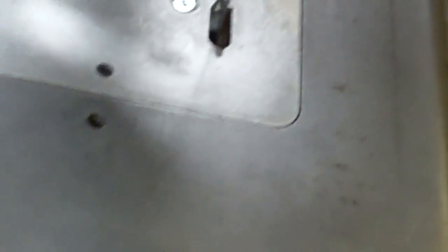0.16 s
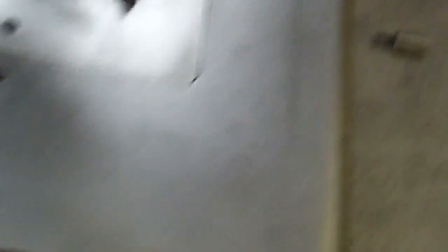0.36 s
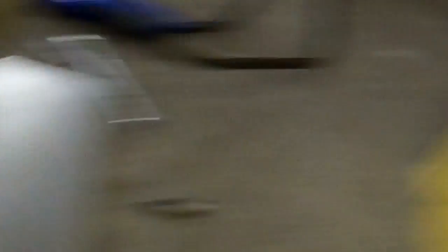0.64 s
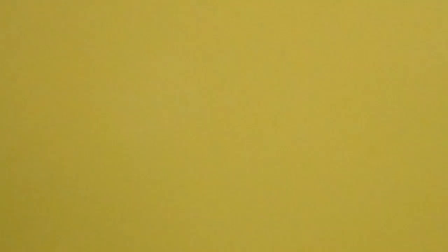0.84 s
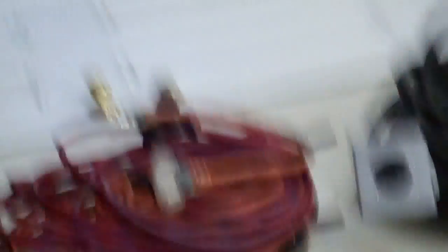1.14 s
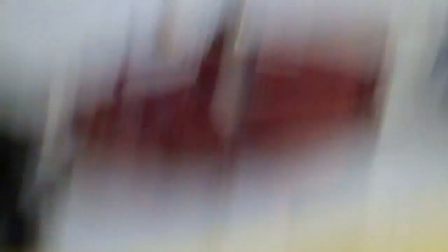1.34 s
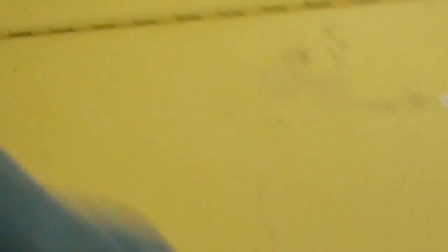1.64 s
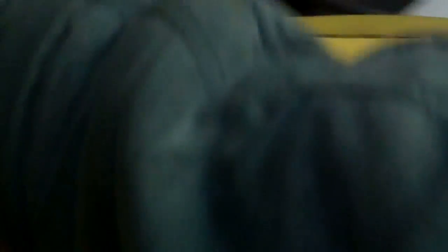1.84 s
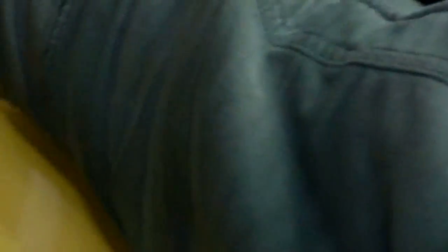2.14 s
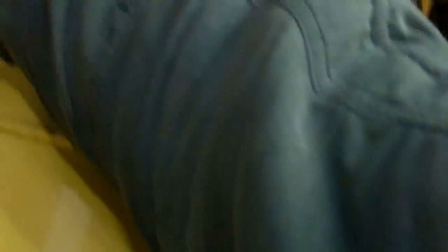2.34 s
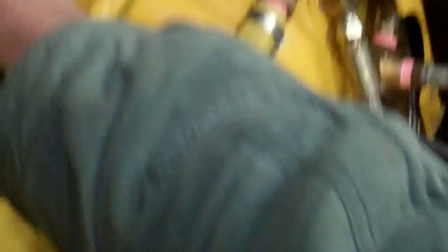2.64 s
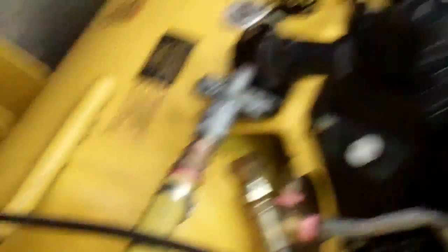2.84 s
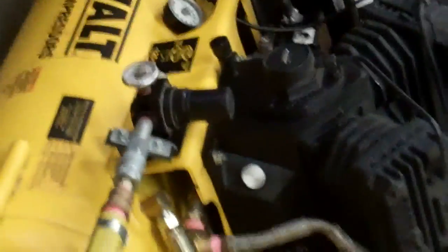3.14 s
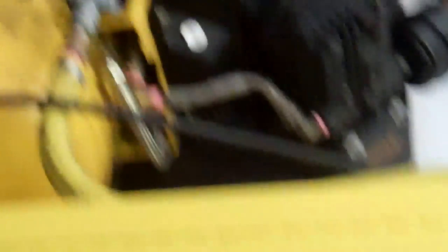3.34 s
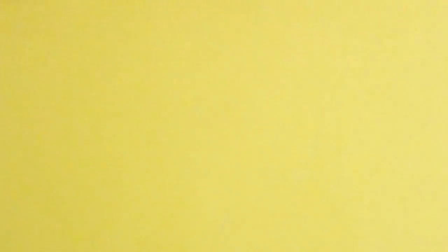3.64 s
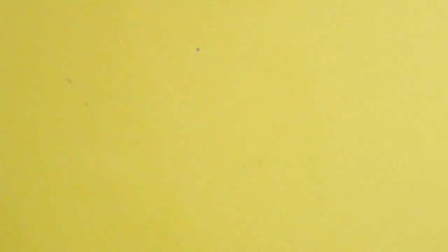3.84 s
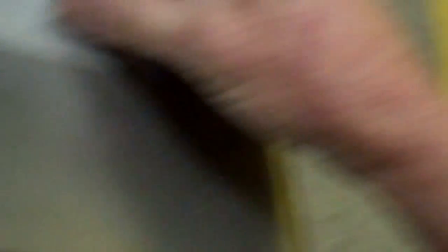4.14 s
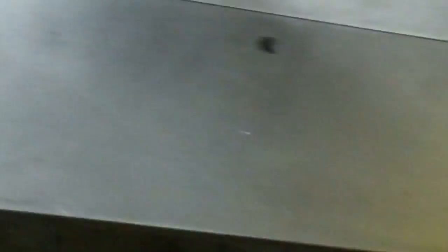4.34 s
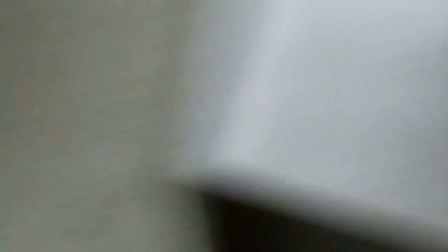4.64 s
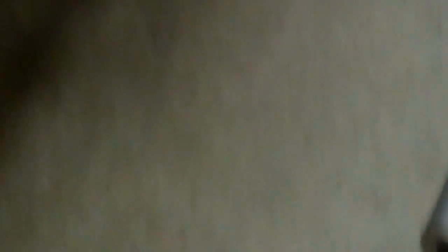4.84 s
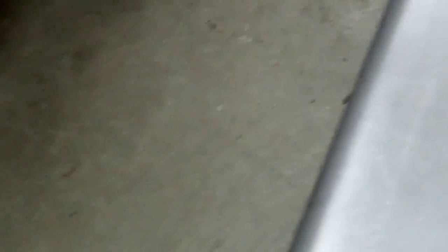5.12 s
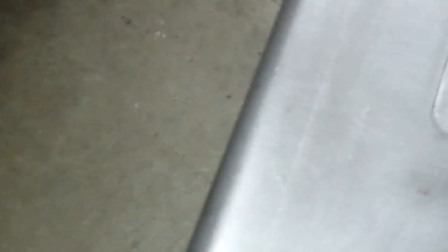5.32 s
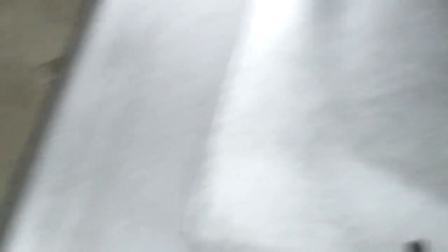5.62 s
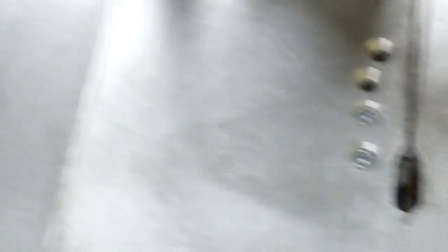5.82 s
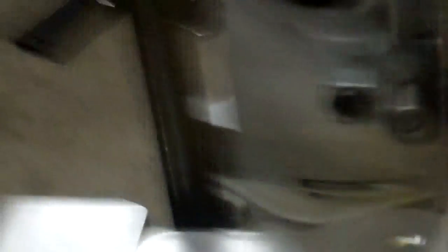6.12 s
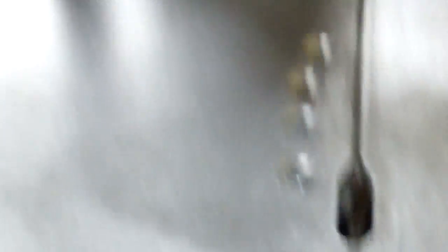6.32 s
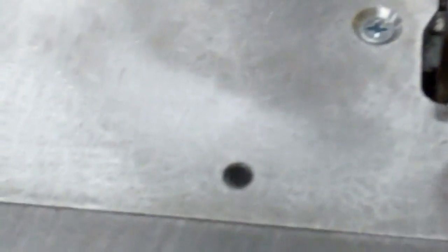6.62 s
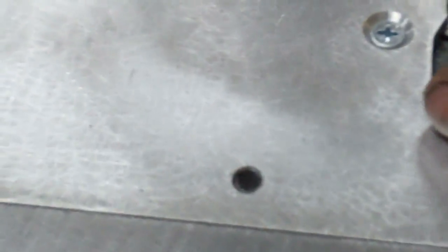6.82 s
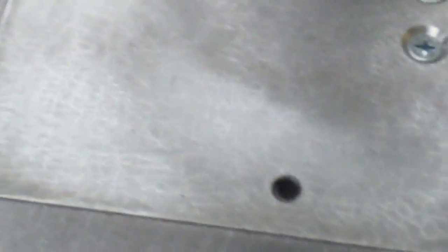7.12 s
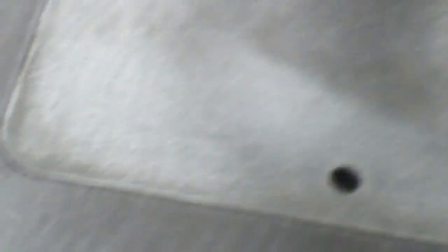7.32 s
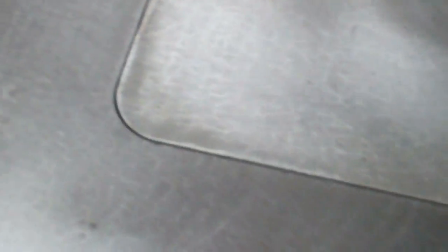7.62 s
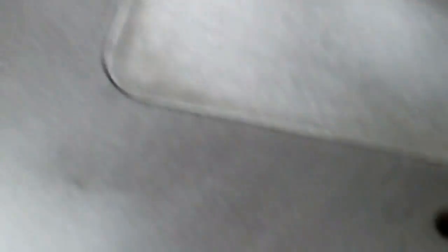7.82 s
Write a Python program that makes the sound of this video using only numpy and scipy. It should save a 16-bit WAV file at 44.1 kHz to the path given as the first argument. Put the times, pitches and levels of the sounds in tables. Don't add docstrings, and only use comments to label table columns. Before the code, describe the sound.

Loud electric saw runs, switches off and winds down grating; quiet handling follows, then sharp rattling steel clanks and small parts set on a table.

```python
import sys
import numpy as np
from scipy import signal
from scipy.fft import rfft, irfft, next_fast_len
from scipy.io import wavfile
from scipy.ndimage import uniform_filter1d

SR = 44100
rng = np.random.default_rng(int(sys.argv[2]) if len(sys.argv) > 2 else 0)


def bounce(signal):
    frames = np.transpose(np.atleast_2d(signal))
    limited = np.clip(frames, -1, 1)
    pcm = np.round(limited * 32767).astype(np.int16)
    wavfile.write(sys.argv[1], SR, pcm)


def makeup_ratio(level_db):
    decades = np.asarray(level_db, float) / 20
    return 10 ** decades


N = 351459
TIME = np.arange(N) / SR

# multiple [1], level/dB
MESH = [(1, 0), (2, -15), (3, -13)]
# multiple of the mesh [1], level/dB
CHATTER = [(2, -6), (3, -2), (4, -3), (5, -3), (6, -3), (7, -4), (8, -5), (9, -6), (10, -7), (12, -8)]
# t/s, half length/s, mesh gain/dB, chatter gain/dB
CATCHES = [
    (2.46, 0.097, 18.5, 0),
    (2.706, 0.027, 4.5, -1),
    (2.931, 0.087, 14, 12),
    (3.132, 0.05, 15, 6),
    (3.185, 0.032, 11, -1),
    (3.239, 0.034, -5, 24),
    (3.333, 0.047, 13.5, 18),
    (3.502, 0.12, 13, 17),
]
# f/Hz, width/Hz, level/dB
HOUSING = [(764, 50, -0.5), (1010, 80, 6.5), (1210, 73, -1), (1344, 61, -4), (1675, 130, 3), (1910, 13, 2),
           (2184, 29, -4.5), (2503, 20, -0.5)]
# multiple of the slot rate [1], level/dB
BARS = [(2, -2), (3, -6), (4, -1), (5, -5), (6, 0), (7, -9), (8, -3), (10, -2), (12, -3), (14, -6)]
# multiple of a turn [1], level/dB
UNBALANCE = [(1, -4), (4, -3)]
# t/s, nearness level/dB, gear housing level/dB, motor vent level/dB
CAMERA = [(0, 1, -5.5, -8.5), (.45, 0, -2.5, -3.5), (.7, -0.5, -9.5, -1.5), (.85, -1.5, -14, -9.5),
          (1.2, -6.5, -20.5, -4), (1.5, -6.5, -20, -13), (1.82, -5, -22, 2), (2.15, -5.5, -39, -1.5),
          (2.3, -4.5, -34, -11), (2.4, -5, -20.5, -13.5), (2.58, -9.5, -16, -9), (2.75, -11, -13, -21.5),
          (3, -12.5, -17.5, -21), (3.3, -13, -20.5, -11), (3.56, -14, -23, -30), (3.63, -25, -28, -45),
          (3.75, -37, -60, -60)]
# f/Hz, level/dB per Hz
DRONE = [(35, -70), (60, -43.5), (92, -63), (123, -26), (177, -35.5), (241, -13), (281, -25.5),
         (312, -16.5), (447, -19), (483, -13), (767, 0), (942, -7), (1300, -5.5), (1690, -18), (2860, -120)]
# f/Hz, level/dB per Hz
RASP = [(530, -50.5), (900, -14.5), (1050, -21), (1530, -4.5), (2080, -4.5), (2490, -4.5), (2760, -2.5),
        (2920, -5.5), (3000, -5), (4720, -8.5), (5000, -17.5), (6500, -41), (11000, -120)]
# f/Hz, level/dB per Hz
HISS = [(2060, -45.5), (3500, -1.5), (3800, 0), (4100, 2.5), (5120, 2.5), (5790, 3), (10800, -0.5),
        (13600, 3), (14200, -11)]
# f/Hz, width/Hz, level/dB
GUARD = [(2280, 50, -5.5), (2670, 72, 2), (3000, 50, -4), (4050, 45, -2.5), (4660, 55, -1.5),
         (4850, 60, -10), (5880, 60, -9)]
# f/Hz, left-right likeness [1]
COHERENCE = [(60, 0.9), (250, 0.96), (600, 0.96), (1400, 0.93), (3000, 0.89), (6000, 0.091), (14000, 0.16)]
# f/Hz, left minus right level/dB
BALANCE = [(60, 0.5), (180, -1), (540, 0.5), (1610, 0.0), (4810, 2), (14400, -2)]
# t/s, ring level/dB, first favoured f/Hz, second favoured f/Hz, crack over ring level/dB
CLANKS = [(5.47, -42.5, 5905, 9028, -12.5), (5.5247, -17, 4484, 9028, 13), (5.5761, -10.5, 9028, 7924, 3.5),
          (5.632, -23.5, 7924, 12810, -14.5), (5.704, -25, 13110, 5905, -10.5),
          (5.758, -27.5, 13110, 6864, 0), (5.828, -5, 6864, 13110, 2), (5.889, -7.5, 11830, 7924, -6),
          (5.944, -10, 6864, 10220, -5), (5.957, -8, 5001, 6864, 3), (5.999, -10.5, 5001, 13110, -10.5),
          (6.049, -11, 13110, 11830, -5), (6.07, -13.5, 11830, 13110, -1.5), (6.1, -15.5, 5905, 7924, -32),
          (6.128, -21, 5905, 6864, -21), (6.175, -28, 5905, 13110, -3), (6.218, -32, 6864, 5905, 2.5)]
# f/Hz, level/dB
PLATE = [(770, -32), (1147, -28), (2150, -24), (2760, -18), (3440, -18), (3564, -21), (4156, -12),
         (4484, -14), (4587, -15), (5001, -7), (5416, -18), (5739, -14), (5905, -6), (6525, -13),
         (6864, -4), (7924, -5), (8118, -11), (9028, -7), (9318, -12), (10220, -7), (10570, -9),
         (11480, -7), (11830, -5), (12020, -12), (12370, -12), (12810, -7), (13110, -5), (13980, -12),
         (14180, -5)]
# contact t/s, f/Hz, level/dB
SPOTS = [(5.5245, 770, 12), (5.5245, 1147, 16), (5.5245, 2150, 14.5), (5.5245, 2760, 5),
         (5.5245, 3440, -16.5), (5.5245, 5001, -9), (5.5245, 10220, 10), (5.5245, 13980, -16),
         (5.5245, 14180, -25), (5.5245, 13110, -6), (5.5245, 11830, -6), (5.5245, 4156, -4),
         (5.5771, 12810, 3), (5.5771, 11480, 0), (5.5771, 5001, -18), (5.5771, 4156, -20),
         (5.5771, 3440, -23.5), (5.5771, 6864, -2.5), (5.5771, 14180, -5.5), (5.5771, 2760, -12),
         (5.5771, 4484, -10.5), (5.5771, 2150, -6.5), (5.5771, 3564, -13), (5.5771, 5905, 1.5),
         (5.63, 5905, 7.5), (5.63, 4156, 2.5), (5.63, 3440, 3), (5.63, 1147, 14.5), (5.63, 9028, -8),
         (5.705, 4156, 10.5), (5.705, 2760, 10.5), (5.705, 3440, 13), (5.705, 10570, 5),
         (5.828, 10570, 5.5), (5.828, 8118, 12.5), (5.828, 5001, 0), (5.5245, 4484, 8), (6.217, 3440, -8),
         (5.828, 5905, -3.5), (5.889, 9028, 11.5), (5.889, 13110, 5.5), (5.889, 2760, 7), (5.959, 14180, 6),
         (5.959, 4156, 7.5), (5.959, 5001, 3.5), (6.0, 5001, 7), (5.959, 2760, -6.5), (5.944, 2760, -7),
         (5.828, 2760, -8.5), (6.0, 11830, 1), (6.0, 4156, 0.5), (6.049, 5905, 1), (6.1, 3440, 3),
         (6.1, 11830, 7), (6.1, 13110, 3), (6.175, 4587, 6), (6.217, 4587, 10), (6.217, 7924, 8.5)]
# t/s, level/dB, brightness/dB per octave, favoured f/Hz, click level/dB
TAPS = [(6.925, -33, 0.5, 598, -12), (6.927, -38.5, 2.5, 1459, -20), (7.056, -43, -5, 598, -11),
        (7.085, -40, -0.5, 598, -6), (7.113, -34, 2, 525, -11), (7.126, -40, -10.5, 1768, -8),
        (7.66, -38, -3, 525, -10), (7.666, -29.5, 4, 4624, 9.5), (7.7, -33.5, 9.5, 7924, 13.5),
        (7.701, -37, 5, 1044, -10), (7.702, -43, 0, 1593, -10)]
# f/Hz, level/dB, t60/s
TABLE = [(525, -13, 0.34), (598, -14, 0.46), (1044, -24, 0.62), (1459, 1, 0.047), (1593, -21, 0.3),
         (1768, -13.5, 0.42), (1940, -11, 0.25), (3100, -9, 0.22), (4200, -13.5, 0.32), (4624, -1, 0.059),
         (7348, -16, 0.17), (7924, -31, 0.38), (8990, -26, .2), (12600, -18, 0.074)]
# t/s, level/dB, f/Hz
GRIP_SHIFTS = [
    (.08, -49, 60),
    (.38, -50.5, 62),
    (1.58, -40, 134),
    (2.351, -40, 262),
    (3.35, -67, 110),
]
# t/s, level/dB, fall/s, centre f/Hz, width/octaves
SCUFFS = [(4.811, -30, 0.029, 4050, 7.7), (4.884, -37.5, .01, 6470, 1.2), (6.916, -31.5, 0.011, 2540, 1.4),
          (6.974, -42, 0.0096, 3950, 1.8), (7.01, -42, 0.0089, 3970, 1.3), (7.6529, -28, 0.035, 2450, 1.45),
          (7.699, -30.5, 0.033, 10000, 1.3), (5.83, -13.5, 0.056, 4000, 11),
          (5.945, -15.5, 0.034, 2900, 13), (6.05, -33, 0.09, 4000, 2.3), (6.1, -26, 0.04, 11000, .5),
          (6.128, -26, 0.041, 10500, 0.54), (6.2, -40, 0.063, 9000, .8), (4.845, -40, .008, 6000, 2)]
# t/s, level/dB, rise/s, fall/s, centre f/Hz
SWISHES = [
    (3.599, -47, .01, 0.11, 6000),
    (4.14, -38.5, 0.092, 0.16, 6000),
    (4.717, -24, 0.031, 0.018, 6000),
    (5.005, -35, 0.02, 0.038, 4850),
    (5.7, -41.5, 0.054, 0.08, 5500),
    (7.099, -31.5, 0.015, 0.023, 2500),
]
# t/s, peak level/dB, centre f/Hz, left minus right level/dB
TICKS = [(1.585, -3.5, 2880, 6), (3.856, -25, 910, -1), (4.278, -39, 6500, 0), (4.333, -30, 900, 0),
         (4.414, -35, 1010, 0), (4.448, -28, 1030, -1), (4.504, -44, 1560, 5), (4.587, -34, 10300, -1.5),
         (4.597, -34, 9000, -1), (4.609, -40, 12400, 0), (4.627, -35, 807, 1), (4.634, -26, 13000, -2),
         (4.7095, -20, 8700, 0), (4.713, -14, 12200, 0), (4.731, -14.5, 1500, 3), (4.738, -7, 670, 0),
         (4.7375, -14, 4900, 1), (4.94, -40, 6860, -11), (4.956, -40, 5000, -4), (5.231, -37, 920, -0.5),
         (6.412, -49, 1190, -1), (6.4118, -42, 5960, 0.5), (6.447, -47, 13200, 1), (6.573, -42.5, 3910, 1),
         (6.919, -28, 11000, -2), (6.925, -28, 2500, -2), (7.055, -37, 2500, 1), (7.092, -27, 4500, 4),
         (7.098, -32, 3000, -6), (7.114, -36, 5000, 0), (7.127, -32, 3500, -2), (7.228, -42, 13000, 0),
         (7.699, -1.5, 12000, 2)]
# t/s, peak level/dB, f/Hz, left minus right level/dB
KNOCKS = [
    (1.182, -3.5, 394, 12.5),
    (3.538, -28, 118, 0),
    (3.734, -24, 358, -1),
    (4.099, -37, 393, -1.0),
    (4.736, -27, 600, 4.5),
    (5.826, -4, 41.7, 4),
    (5.945, -19, 75.4, -20),
    (6.047, -22.5, 38.5, -10),
    (6.071, -22.5, 443, -9),
    (7.698, -21, 500, -5),
]
# t/s, level/dB
BUSY = [(2.3, -66), (3.3, -75), (3.55, -41), (3.8, -44.5), (4.25, -49), (4.63, -54), (4.9, -54),
        (5.21, -47.5), (5.46, -54), (6.1, -52), (6.5, -60), (6.97, -54), (7.3, -59.5), (7.67, -57.5),
        (7.97, -69.5)]
# f/Hz, level/dB per Hz
RUB = [(15, -54.5), (25, -16), (103, 3), (145, -3), (257, -3.5), (350, -3), (666, -4), (893, -4),
       (2000, -13.5), (2600, -42), (4400, -120)]
# f/Hz, level/dB per Hz
CLOTH = [(290, -31.5), (500, -20.5), (662, -7), (888, -10), (1710, -8), (1860, -8), (2840, -2.5),
         (7460, -6.5), (14200, -2.5)]
# f/Hz, t60/s
GARAGE = [(200, 0.24), (1500, 0.26), (6000, 0.033), (14000, 0.058)]

FULL_TURNS_HZ, OFF_S, DRAG_PER_S, FRICTION_HZ = 315.9, 2.3164, .6045, 243.3
COASTING = TIME > OFF_S
PINION, SLOTS, BLADES = 9, 12, 36
GEAR_DB, CHATTER_DB, BARS_DB, SLOT_DB, FAN_DB = -18, -35, -32, -31.5, -27
DRONE_DB, RASP_DB, HISS_DB, CASING_DB, GUARD_DB = -20.5, -16, -14, -25, -19
CASING_HZ, TURNED_HZ, TURN_S = 819, 733, (1.4, 2.4)
LAG_S = .00009
PLATE_T60_S, STOP_T60_S, HELD_T60_S = .55, .04, 1.
LIFTED_S = 6.985
SCUFF_RISE_S = 0.0024
DUCK_DB, DUCK_FROM_DB, RECOVER_DB_PER_S = 12, -35.5, 53.5


def evened(x):
    return x / np.sqrt(np.mean(x ** 2) + 1e-20)


def read(points, hz):
    f, value = np.transpose(points)
    return np.interp(np.log(hz + 1), np.log(f + 1), value)


def columns(rows, off_db=-120):
    s, *rest = np.transpose(rows)
    return [np.interp(TIME, s, c, off_db, off_db) for c in rest]


def add(mix, s, sound, pan_db=0):
    part = mix[:, round(s * SR):][:, :sound.shape[1]]
    sides = makeup_ratio(np.array([[.5], [-.5]]) * pan_db)
    part += (sound * sides)[:, :part.shape[1]]


def wander(hz, rows=1):
    steps = rng.standard_normal((rows, int(hz * N / SR) + 2))
    return 1.1 * np.array([np.interp(TIME * hz, np.arange(len(row)), row) for row in steps])


def filtered(x, order, hz, kind="low"):
    return signal.lfilter(*signal.butter(order, hz, kind, fs=SR), x)


def resonance(x, hz, width):
    return signal.lfilter(*signal.iirpeak(hz, hz / width, SR), x)


def noise(shape, patchy_db, flicker_db):
    frames, hz = N // 256 + 5, np.fft.rfftfreq(1024, 1 / SR)
    a, b, c, d, patches = rng.standard_normal((frames, 513, 5)).T
    patches = uniform_filter1d(patches, size=10, axis=0)
    patches = evened(uniform_filter1d(patches, size=8, axis=1))
    flicker = evened(uniform_filter1d(rng.standard_normal(frames), size=2))
    same = np.clip(read(COHERENCE, hz), -1, 1)[:, None]
    left = a + 1j * b
    right = same * left + np.sqrt(1 - same ** 2) * (c + 1j * d)
    z = np.array([left, right])
    z *= makeup_ratio(read(shape, hz)[:, None] + patchy_db * patches + flicker_db * flicker)
    z[1] *= np.exp(-2j * np.pi * hz * LAG_S)[:, None]
    z *= makeup_ratio(np.array([.5, -.5])[:, None, None] * read(BALANCE, hz)[:, None])
    return evened(signal.istft(z, nperseg=1024, noverlap=768)[1][:, :N])


def burst(seconds, hz, octaves):
    n = next_fast_len(round(seconds * SR))
    raw = rng.standard_normal((3, n))
    distance = np.log2((np.fft.rfftfreq(n, 1 / SR) + 1) / hz) / octaves
    return evened(irfft(rfft(raw[:2] + 0.59 * raw[2]) * np.exp(-.5 * distance ** 2), n))


def lines(hz, orders, waver_db, top_hz=14300):
    turns = np.cumsum(hz * (1 + .0009 * wander(40)[0])) / SR
    out = np.zeros((2, N))
    for k, db in orders:
        phase = rng.random() + np.array([[.12], [-.12]]) * min(k * .2, 1)
        level = makeup_ratio(db + waver_db * wander(30)) * (k * hz < top_hz)
        out += level * np.sqrt(2) * np.cos(2 * np.pi * (k * turns + phase))
    return out


def speed():
    decay = np.exp(-DRAG_PER_S * np.maximum(TIME - OFF_S, 0))
    return np.maximum((FULL_TURNS_HZ + FRICTION_HZ) * decay - FRICTION_HZ, 1)


def gears(turn_hz, side_db):
    catch_db, loose_db = sum(np.outer(db, np.exp(-((TIME - s) / half) ** 2)) for s, half, *db in CATCHES)
    mesh_hz = PINION * turn_hz
    view_db = np.where(COASTING, side_db - 4, np.maximum(side_db + 6.5, -11))
    gear = makeup_ratio(GEAR_DB + view_db + catch_db) * lines(mesh_hz, MESH, waver_db=1.8)
    sharp = lines(mesh_hz, [(2, 0), (3, -1)], waver_db=3)
    gear += makeup_ratio(GEAR_DB - 11 + side_db + catch_db) * COASTING * sharp
    loose = lines(mesh_hz * (1 + .03 * wander(150)[0]), CHATTER, waver_db=3.5)
    gear += filtered(makeup_ratio(CHATTER_DB + .45 * side_db + loose_db) * loose, 2, (1300, 2900), "band")
    housing = (.3 + .35 * ~COASTING) * gear
    housing += sum(makeup_ratio(db) * resonance(gear, hz, width) for hz, width, db in HOUSING)
    return filtered(housing, 4, 680, "high")


def commutator(turn_hz, vent_db):
    level = makeup_ratio(BARS_DB + 2.5 * COASTING + np.minimum(.5 * vent_db, vent_db + 8))
    return filtered(level * lines(SLOTS * turn_hz, BARS, waver_db=3.), 3, 4000, "high")


def magnetic_slots(turn_hz, vent_db):
    return makeup_ratio(SLOT_DB + vent_db - 25 * COASTING) * lines(turn_hz, [(SLOTS, 0), (20, -10)], waver_db=3.5)


def motor():
    turn_hz = speed()
    _, side_db, vent_db = columns(CAMERA)
    rate = turn_hz / turn_hz[0]
    shake = makeup_ratio(-46 - .3 * side_db) * rate ** 4 * lines(turn_hz, UNBALANCE, waver_db=3)
    fan = (makeup_ratio(FAN_DB + side_db) + makeup_ratio(FAN_DB - 9 + .5 * vent_db)) * rate
    fan_tone = fan * lines(BLADES * turn_hz, [(1, 0)], waver_db=2)
    brushes = commutator(turn_hz, vent_db)
    return gears(turn_hz, side_db) + brushes + magnetic_slots(turn_hz, vent_db) + shake + fan_tone


def low_side():
    near_db = columns(CAMERA)[0]
    return np.minimum(0.37 * near_db, near_db + 20) + 9 * np.log10(speed() / FULL_TURNS_HZ)


def air():
    near_db = columns(CAMERA)[0]
    drone = makeup_ratio(DRONE_DB + low_side()) * noise(DRONE, patchy_db=0.9, flicker_db=2.0)
    drone = filtered(drone, 3, 110, "high")
    uneven_db = 1.7 * np.clip((TIME - 2.9) / 0.093, 0, 1) * wander(24.84)[0]
    rasp = makeup_ratio(RASP_DB + 1.033 * near_db + uneven_db) * noise(RASP, patchy_db=0.7, flicker_db=1.1)
    return drone + rasp + makeup_ratio(HISS_DB + near_db) * noise(HISS, patchy_db=1.45, flicker_db=0.85)


def guard():
    near_db, side_db, _ = columns(CAMERA)
    rasp = noise([(100, 0), (14000, 0)], patchy_db=2.5, flicker_db=1.5)
    ring = sum(makeup_ratio(db) * evened(resonance(rasp, hz, width)) for hz, width, db in GUARD)
    return makeup_ratio(GUARD_DB + .5 * (near_db + side_db)) * evened(ring)


def casing():
    hz = np.interp(TIME, TURN_S, (CASING_HZ, TURNED_HZ))
    slow = filtered(rng.standard_normal(N) + 1j * rng.standard_normal(N), 2, 48)
    carrier = np.exp(2j * np.pi * np.cumsum(hz) / SR)
    return makeup_ratio(CASING_DB + 1.7 * low_side()) * evened((slow * carrier).real)


def plate():
    hz, mode_db = np.transpose(PLATE)[:, :, None]
    t, out = np.arange(SR // 3) / SR, np.zeros((2, N))
    spin = np.exp(2j * np.pi * hz * t)
    stops = [(row[0], STOP_T60_S) for row in CLANKS[1:]] + [(CLANKS[-1][0], HELD_T60_S)]
    for (s, db, first_hz, second_hz, crack_db), (end, stop_t60) in zip(CLANKS, stops):
        chance = rng.standard_normal((len(PLATE), 6))
        hard_db = .3 * (crack_db + 3) * (hz < 3700) + 1.5 * np.log2(hz / 7000)
        favour_db = 8 * (abs(hz - first_hz) < 60) + 6.5 * (abs(hz - second_hz) < 60)
        favour_db += sum(lift_db * (abs(hz - f) < 60) for at, f, lift_db in SPOTS if abs(at - s) < .0045)
        size = makeup_ratio(mode_db + 1.5 * chance[:, :1] + favour_db + hard_db)
        size /= np.sqrt(np.sum(size ** 2) / 2)
        fall_db = -60 * t / PLATE_T60_S * (hz / 7000) ** 0.099
        fall_db -= 60 * np.maximum(t - (end - s), 0) / stop_t60 * np.minimum(hz / 5000, 1) ** 0.78
        loose = 1 + 3.5 * uniform_filter1d(rng.standard_normal((len(PLATE), len(t))), size=300)
        beat = 1 + .5 * np.cos(2 * np.pi * hz * .004 * chance[:, 1:2] * t + 3 * chance[:, 2:3])
        angle = 3 * chance[:, 4:5] + (.7 + .2 * chance[:, 5:]) * [1, -1]
        ports = makeup_ratio(2 * chance[:, 3:4] * [1, -1]) * np.exp(1j * angle)
        ring = (ports.T @ (size * makeup_ratio(fall_db) * beat * loose * spin)).imag
        scatter = np.exp(-t / .0008) + .6 * np.exp(-t / .003) + .2 * np.exp(-t / .012)
        crack = makeup_ratio(crack_db) * burst(1 / 3, 11000, octaves=2.42)[:, :len(t)] * scatter
        clank = ring * (1 - np.exp(-t / 0.0032)) + crack * (1 - np.exp(-t / 0.00016))
        add(out, s, makeup_ratio(db) * clank, pan_db=-1.0)
    return out


def taps():
    hz, mode_db, t60 = np.transpose(TABLE)[:, :, None]
    t, out = np.arange(SR // 3) / SR, np.zeros((2, N))
    for s, db, tilt_db, favoured_hz, click_db in TAPS:
        phase = rng.random((2, len(TABLE), 1)) * hz / 400
        size_db = mode_db + tilt_db * np.log2(hz / 2000) + 13 * np.exp(-((hz - favoured_hz) / 30) ** 2)
        stilled_db = 900 * (s < LIFTED_S) * np.maximum(s + t - LIFTED_S, 0)
        modes = makeup_ratio(size_db - 60 * t / t60 - stilled_db) * np.sin(2 * np.pi * hz * t + phase)
        ring = np.sum(modes, axis=1)
        click = makeup_ratio(click_db) * burst(1 / 3, 4100, octaves=1.4)[:, :len(t)] * np.exp(-t / 0.0069)
        add(out, s, makeup_ratio(db) * (.5 * ring + click))
    return out


def grip_shifts():
    out = np.zeros((2, N))
    for s, db, hz in GRIP_SHIFTS:
        sound = burst(.2, hz, octaves=.22)
        add(out, s - .1, makeup_ratio(db) * sound * np.hanning(sound.shape[1]))
    return out


def slides():
    out = np.zeros((2, N))
    scuffs = [(s, db, SCUFF_RISE_S, *rest) for s, db, *rest in SCUFFS]
    swishes = [(*row, (row[4] - 1400) / 1150) for row in SWISHES]
    for s, db, rise, fall, hz, octaves in scuffs + swishes:
        sound = burst(.7, hz, octaves)
        t = np.arange(sound.shape[1]) / SR - .25
        add(out, s + t[0], makeup_ratio(db) * sound * np.exp(-np.where(t < 0, -t / rise, t / fall)))
    return out


def ticks():
    t, out = np.arange(1500) / SR, np.zeros((2, N))
    for s, db, hz, pan_db in TICKS:
        add(out, s, makeup_ratio(db - 3) * burst(len(t) / SR, hz, octaves=.65) * np.exp(-t / .0025), pan_db)
    return out


def knocks():
    t, out = np.arange(1500) / SR, np.zeros((2, N))
    for s, db, hz, pan_db in KNOCKS:
        push = np.sin(2 * np.pi * hz * t) * np.exp(-t * (hz * 2.4 + 60))
        contact = 0.39 * burst(len(t) / SR, hz + 250, octaves=0.98) * np.exp(-t / 0.0069)
        add(out, s, makeup_ratio(db - 1.5) * (push + contact) * (1 - np.exp(-t / 0.000093)), pan_db)
    return out


def rustle(loud):
    fall_db = TIME * RECOVER_DB_PER_S
    power_db = 10 * np.log10(abs(uniform_filter1d((loud ** 2).mean(0), size=400)) + 1e-12)
    held_db = np.maximum.accumulate(power_db + fall_db) - fall_db
    over_db = np.clip(held_db - DUCK_FROM_DB, 0, DUCK_DB)
    rub = noise(RUB, patchy_db=1.5, flicker_db=2.5)
    cloth = noise(CLOTH, patchy_db=.8, flicker_db=1.5)
    return makeup_ratio(columns(BUSY)[0] - over_db) * (rub + makeup_ratio(6.5) * cloth)


def garage(x):
    tail = np.zeros((2, SR // 2))
    at = np.arange(200, SR // 2 - 20, 20) + rng.integers(0, 20, (2, (SR // 2 - 201) // 20))
    np.put_along_axis(tail, at, rng.choice([-1., 1.], at.shape), axis=1)
    hz, t, z = signal.stft(tail, SR, nperseg=256)
    tail = signal.istft(z * makeup_ratio(-60 * t / read(GARAGE, hz)[:, None]), SR, nperseg=256)[1]
    return signal.fftconvolve(x, tail / np.linalg.norm(tail[0]), axes=1)[:, :N]


def scene():
    whine, metal = motor(), plate() + taps()
    saw = whine + air() + guard() + casing()
    hands = grip_shifts() + slides() + ticks() + knocks()
    return saw + metal + hands + rustle(metal) + garage(makeup_ratio(-13) * metal + makeup_ratio(-7) * whine)


def low_pass(x):
    return signal.sosfilt(signal.butter(12, 15010, fs=SR, output="sos"), x)


def record(dry):
    thin = filtered(dry, 1, 60, "high")
    edge = signal.firwin(511, 14280, window=("kaiser", 9), fs=SR)
    limited = signal.oaconvolve(np.clip(thin, -1.1, 1.1), edge[None], "same")
    return low_pass(np.clip(limited, -1, 1))


dry = scene()
out = record(dry)
bounce(out)
```